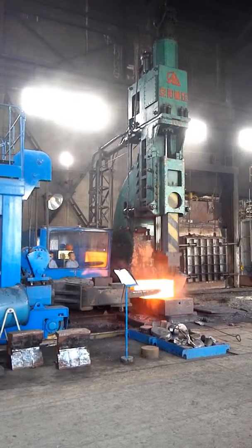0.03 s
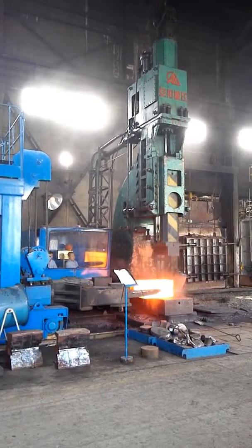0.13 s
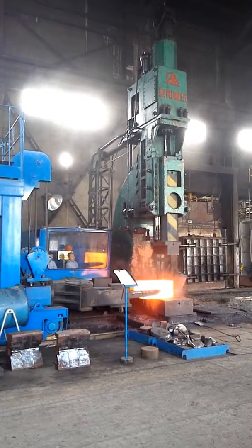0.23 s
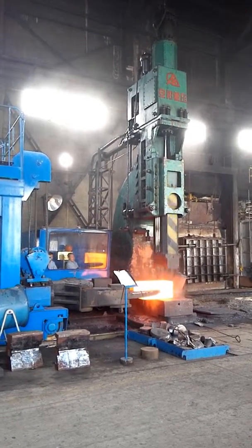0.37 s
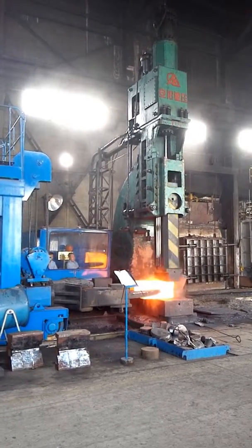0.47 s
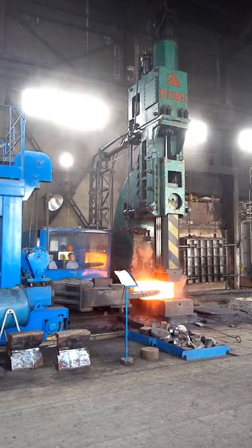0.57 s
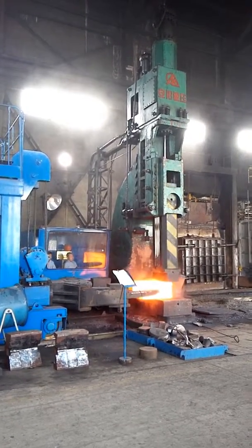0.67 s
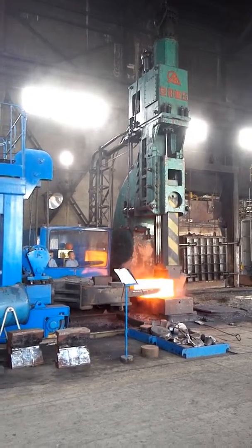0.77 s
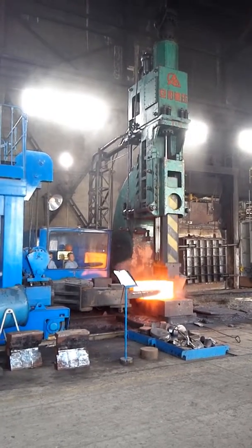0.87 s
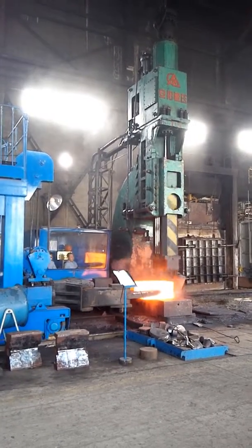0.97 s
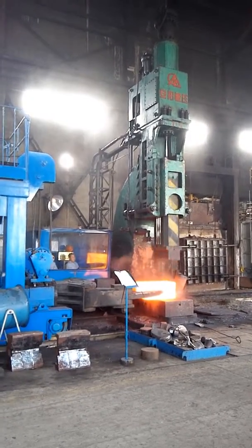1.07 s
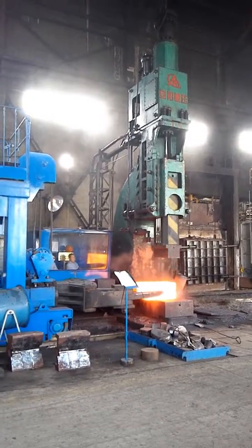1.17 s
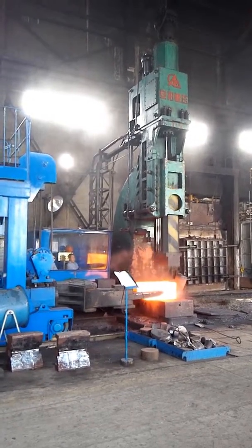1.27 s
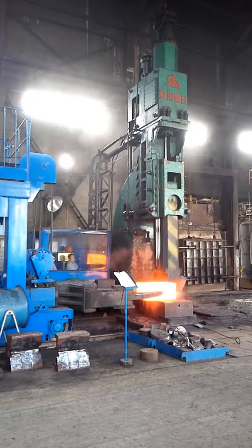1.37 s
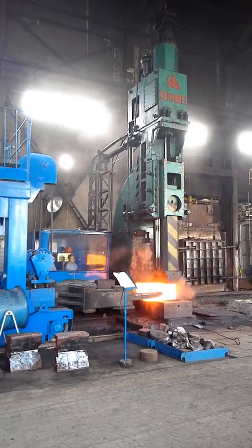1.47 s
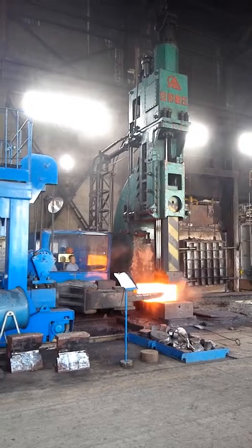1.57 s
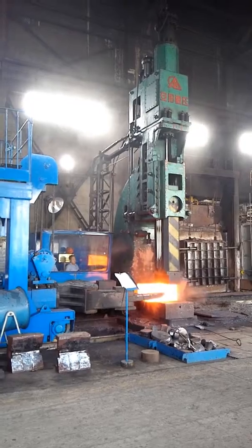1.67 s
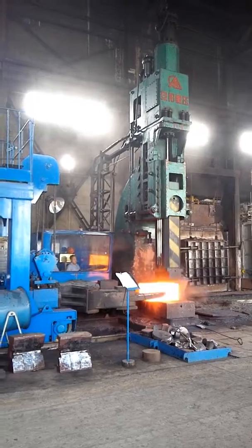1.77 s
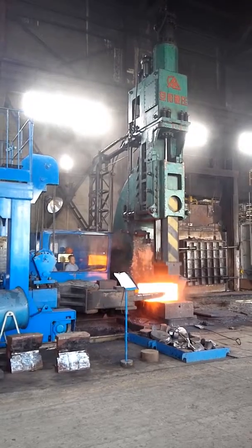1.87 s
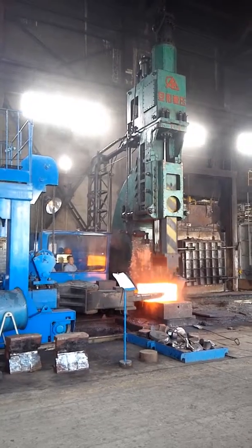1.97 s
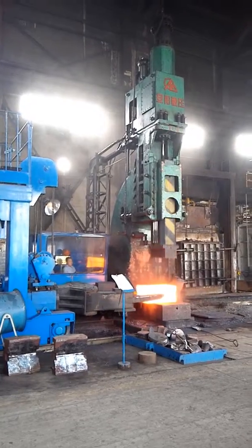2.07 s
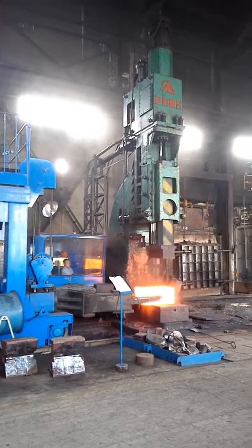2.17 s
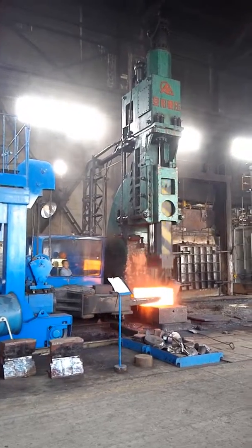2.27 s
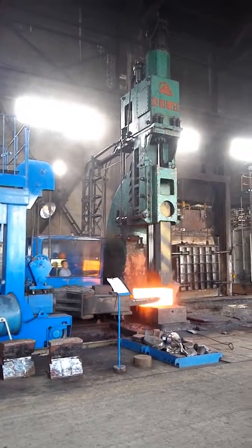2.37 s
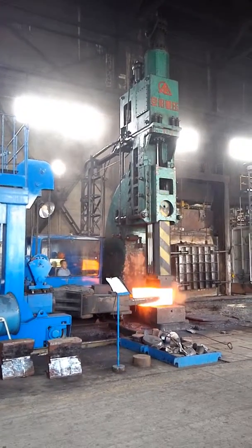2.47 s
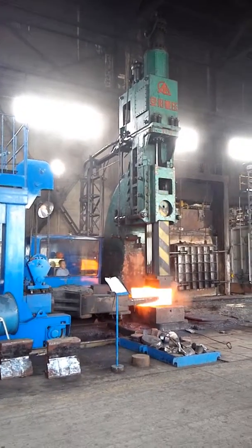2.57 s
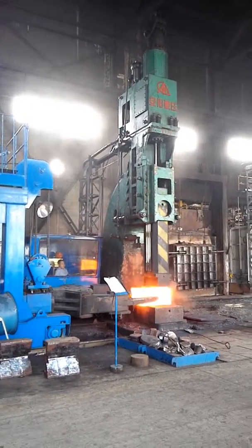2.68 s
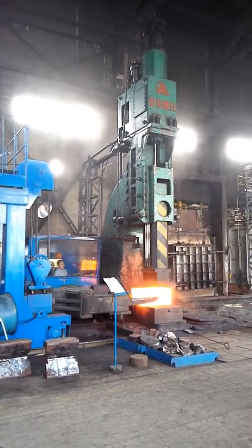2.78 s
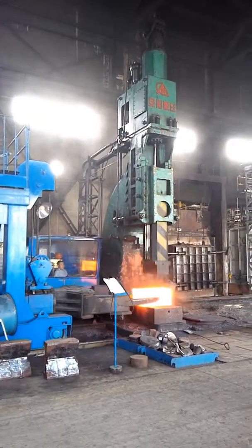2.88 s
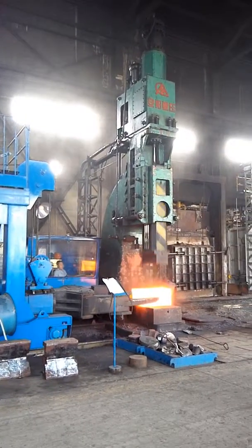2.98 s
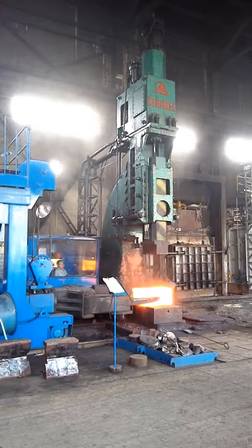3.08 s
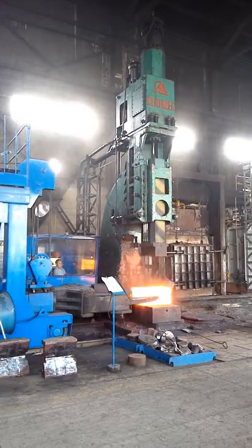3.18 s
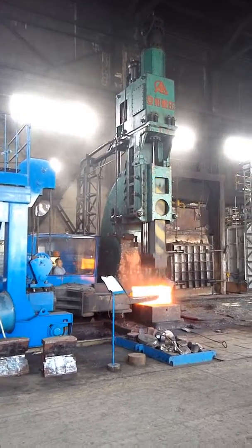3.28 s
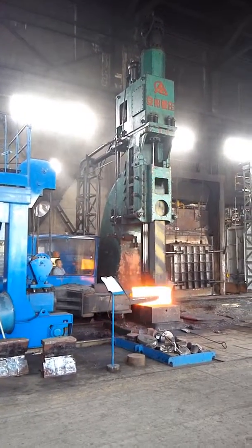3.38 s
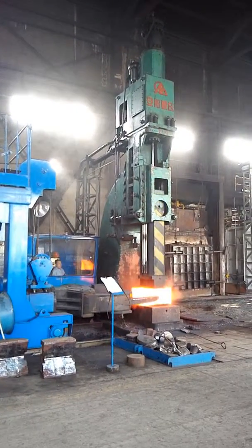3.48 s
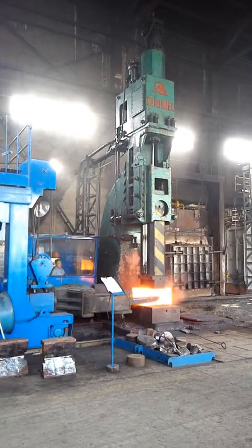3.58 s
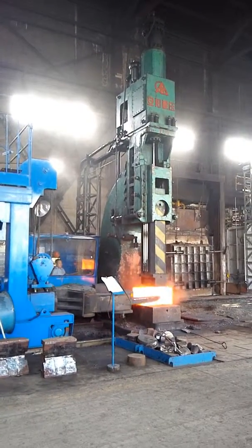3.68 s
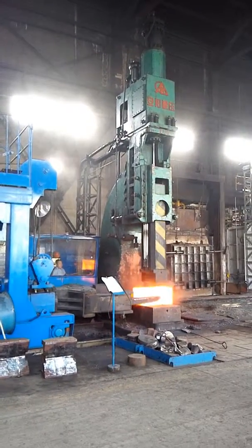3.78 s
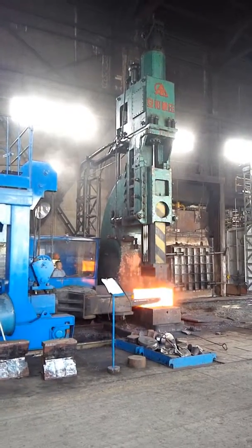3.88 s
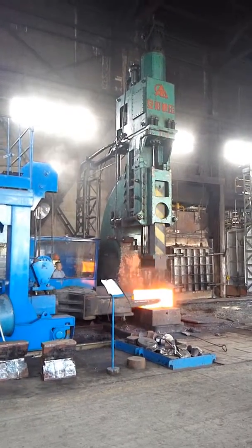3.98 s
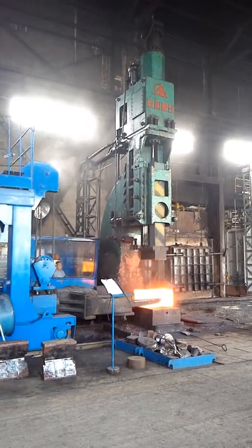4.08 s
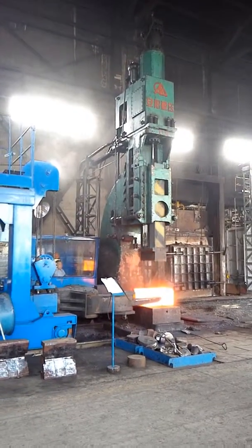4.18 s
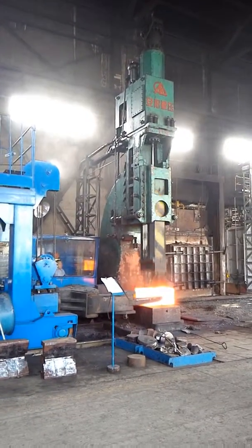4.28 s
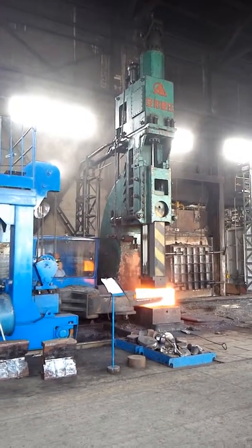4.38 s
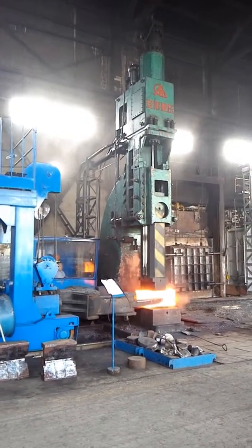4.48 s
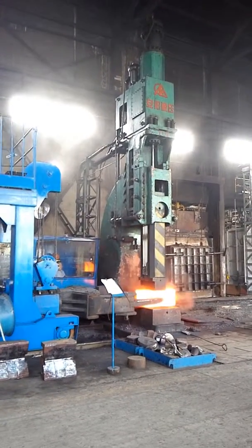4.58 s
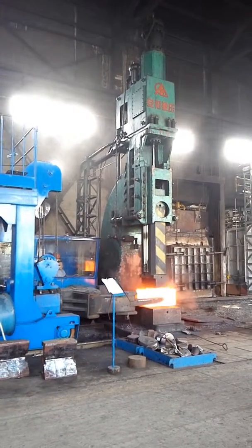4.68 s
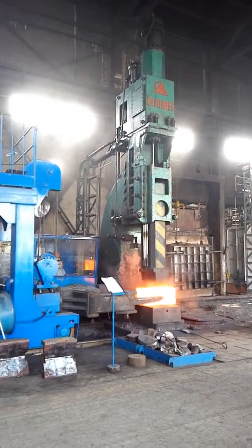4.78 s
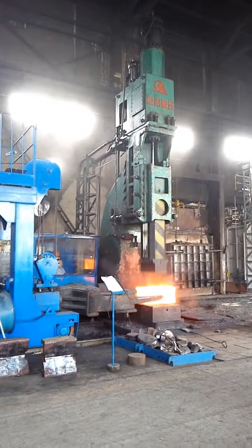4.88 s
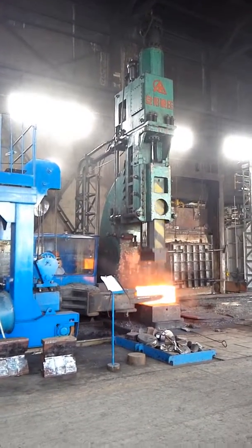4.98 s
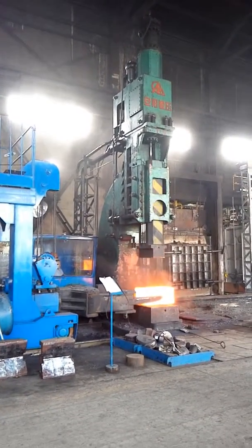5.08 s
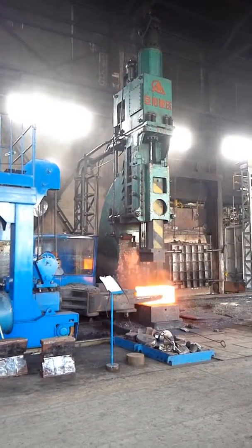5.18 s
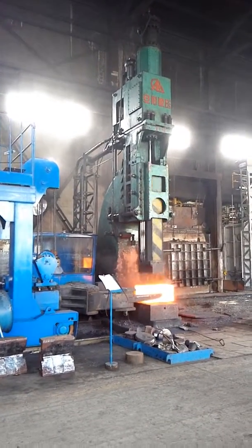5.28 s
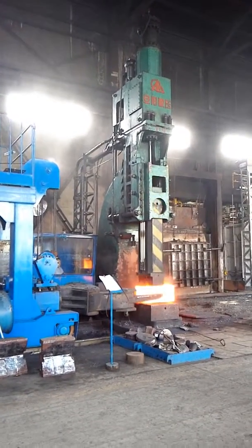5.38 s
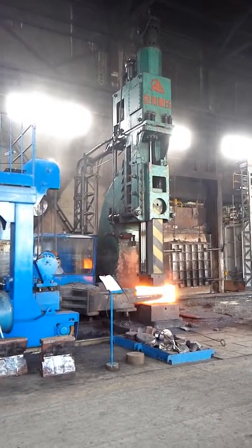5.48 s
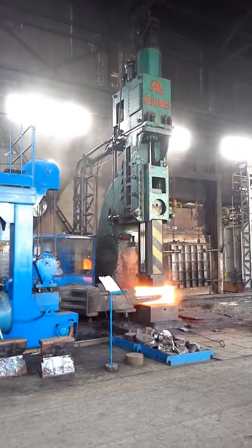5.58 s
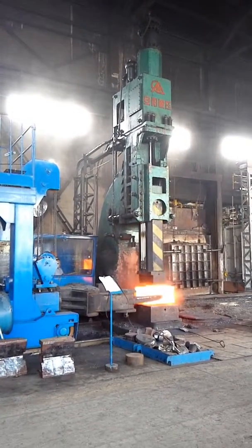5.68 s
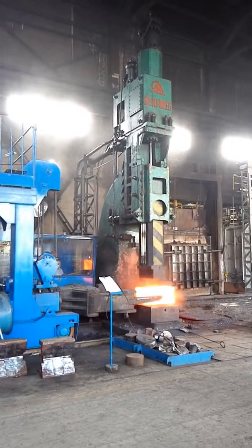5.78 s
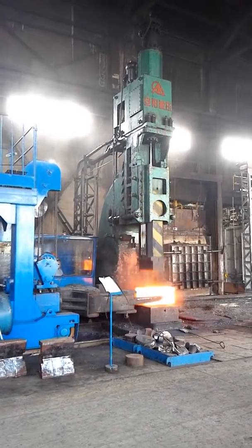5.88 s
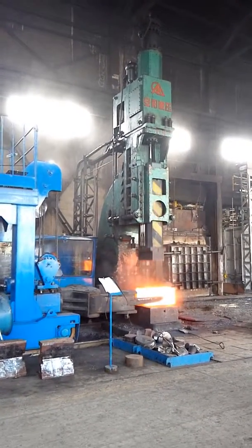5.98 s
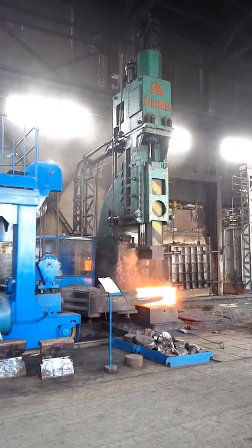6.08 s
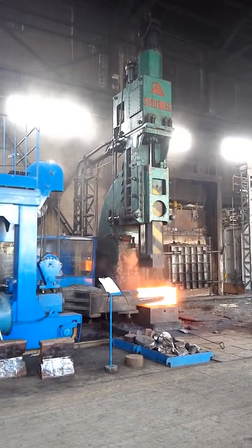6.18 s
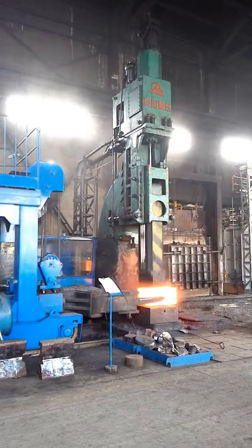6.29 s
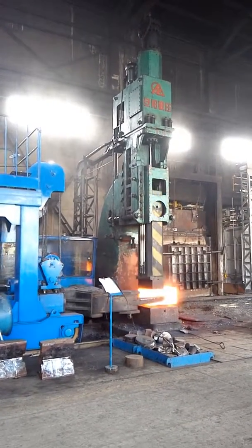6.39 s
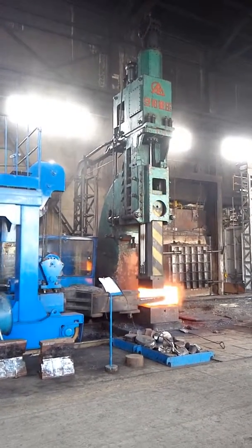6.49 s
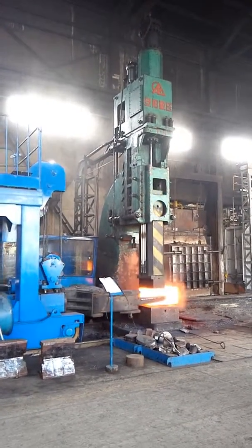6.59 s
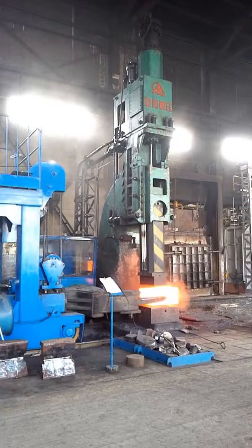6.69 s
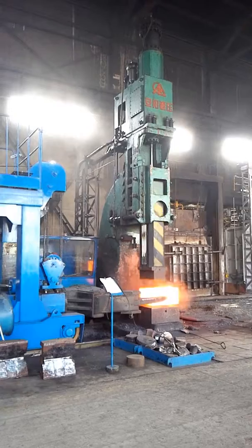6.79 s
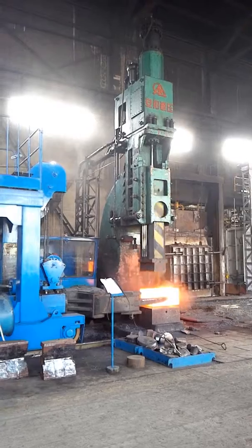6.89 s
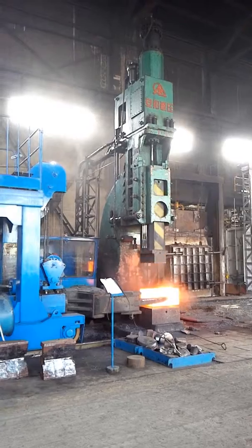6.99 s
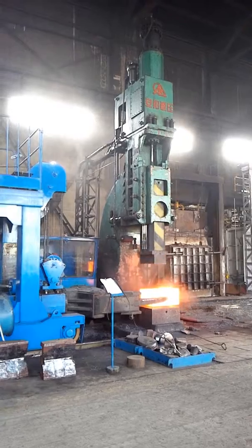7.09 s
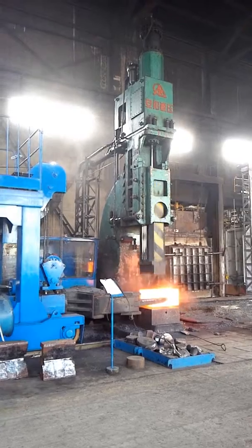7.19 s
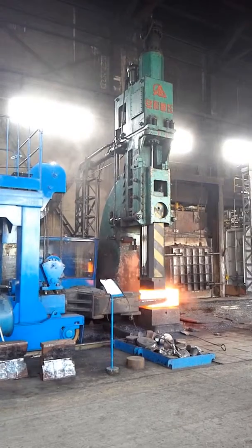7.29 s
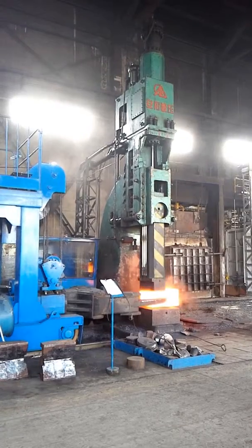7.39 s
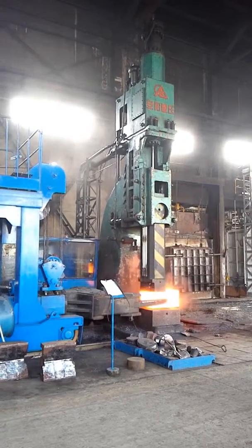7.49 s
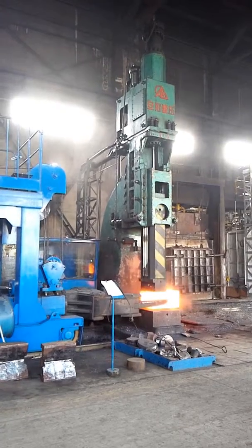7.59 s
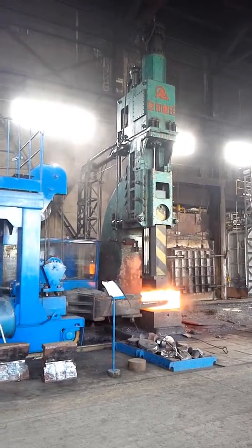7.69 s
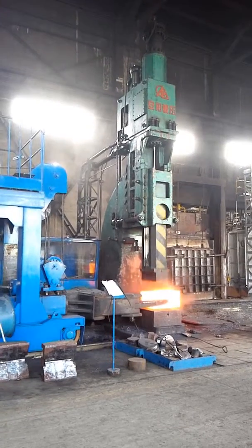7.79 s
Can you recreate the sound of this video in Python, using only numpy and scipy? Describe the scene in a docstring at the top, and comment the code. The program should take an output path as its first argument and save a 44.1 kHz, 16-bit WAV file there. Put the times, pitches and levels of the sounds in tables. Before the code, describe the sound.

The tail of a previous blow is fading over a low burner and fan drone. Then eight heavy hammer blows follow at nearly even one-second spacing, the early ones duller, the later ones harder and more ringing. Between them come short airy valve hisses, a few loose steel knocks and tiny high chinks. The large hall smears every strike into the next. Stereo handheld-style pickup from several metres, slightly clipped on peaks.

```python
"""A drone of furnaces and pumps fills a huge steel-framed hall in which an earlier hammer blow is still dying away.
A hydraulic forging hammer, some metres off, then strikes hot steel about once a second. Each blow is a push on
the ground, short-lived modes of ram and dies, longer ones of the frame, and a crash of noise; the valve hisses on
each return stroke, loose steel knocks and small parts chink. The hall is noise in third octaves, shaped by the
energy of blows and valve after two-slope echoes. Two small microphones hear it in stereo."""
import sys
import numpy as np
from scipy import signal
from scipy.fft import rfft, irfft
from scipy.io import wavfile

SR = 44100
rng = np.random.default_rng(int(sys.argv[2]) if len(sys.argv) > 2 else 0)


def invert_db(level):
    """Linear amplitude ratio for a level in decibels (20 dB per decade), elementwise."""
    return 10 ** (np.asarray(level, dtype=float) / 20)


def inscribe(sig):
    """Save sig as 16-bit PCM at rate SR to the path in sys.argv[1].

    A 1-D sig is mono; a 2-D sig holds one channel per row.
    Samples are clipped to [-1, 1] before scaling.
    """
    pcm = np.round(np.clip(np.atleast_2d(sig).T, -1, 1) * 32767)
    wavfile.write(sys.argv[1], SR, pcm.astype(np.int16))


N = 345744
STEP, LEAD = 21, 1050  # samples per step of an energy curve; steps kept before the start


def along(table, hz, column=1):
    """Read a table column between its rows on a log-frequency axis."""
    rows = np.array(table, float)
    return np.interp(np.log(hz + 1), np.log(rows[:, 0]), rows[:, column])


def colour(x, table):
    """Filter by a spectrum table, then scale to unit rms."""
    y = irfft(rfft(x) * invert_db(along(table, np.fft.rfftfreq(N, 1 / SR))), N)
    return y / np.sqrt(np.mean(y ** 2))


def fade(t, t60, rise):
    """Swell with time constant rise, then fall 60 dB in t60."""
    return (1 - np.exp(-t / max(rise, 1e-4))) * 1000. ** (-t / t60)


def walk(rate, size=2):
    """Slow random wander through rate normal knots a second, spread near 1."""
    knots = rng.standard_normal((size, int(N / SR * 40)))
    at = np.arange(N) / SR * rate
    return np.array([np.interp(at, np.arange(len(k)), k) for k in knots])


def add(out, x, i):
    """Mix x into out from index i, trimming what falls outside."""
    a, b = max(i, 0), min(i + x.shape[-1], out.shape[-1])
    if b > a:
        out[..., a:b] += x[..., a - i:b - i]


# How alike sound from all sides is at the two microphones: pitch_hz, left_right_correlation
LIKENESS = [(30, .93), (70, .965), (150, .94), (280, .62), (450, -.05), (650, -.33), (1000, .05),
            (1340, .12), (2900, 0)]


def diffuse(size):
    """Spectrum of stereo noise that arrives from all sides: nearly alike at both ports in the bass only."""
    like = np.clip(along(LIKENESS, np.fft.rfftfreq(size, 1 / SR)), -.99, .99)
    mid, side = rfft(rng.standard_normal((2, size)))
    mid = mid * np.sqrt(1 + like)
    side = np.array([[1], [-1]]) * side * np.sqrt(1 - like)
    return (mid + side) / np.sqrt(2)


# Spectrum of burners and fans, before scaling to unit rms: pitch_hz, level_db (per Hz, relative)
DRONE_SPECTRUM = [(25, -16), (60, 5.5), (130, -4), (300, 1.5), (500, -5.5), (1200, -9), (2500, -18),
                  (5000, -24), (9000, -23.5), (14000, -39.5)]
# Pump tones, mean level: pitch_hz, level_db
PUMP_TONES = [(150.7, -40), (290.7, -44), (366, -55), (1215, -52)]
DRONE_DB = -36  # mean level of the roar


def drone():
    """Far furnace burners and fans as diffuse noise, with a few pump tones wavering in level and phase."""
    t = np.arange(N) / SR
    roar_gain = invert_db(DRONE_DB + 0.4 * walk(3.3, size=1))
    out = roar_gain * colour(irfft(diffuse(N), N), DRONE_SPECTRUM)
    for hz, db in PUMP_TONES:
        gain = invert_db(db + 0.88 * walk(8, size=1))
        out = out + gain * np.sin(2 * np.pi * hz * t + 1.65 * walk(5, size=1))
    return out


# Hammer blows, the first before the start; contact is the rise time constant, hum is the frame near 470 Hz,
# levels set each blow's parts relative to other blows: start_s, crash_db, thud_db, contact_s, hum_db
BLOWS = [(-.42, -14.5, -16, 0.0029, -33), (0.5545, -14, -15, 0.0027, -40), (1.479, -19.5, -15, 0.0034, -37),
         (2.500, -18, -16, 0.0025, -29), (3.488, -12, -15.5, 0.0025, -22), (4.477, -12, -15, 0.0028, -22.5),
         (5.4457, -13, -15, 0.0015, -21.5), (6.412, -9.5, -13, 0.0038, -20),
         (7.384, -12, -15, .0022, -22.5)]
# Colour of crashing loose steel: pitch_hz, level_db (per Hz, relative)
CRASH_SPECTRUM = [(150, -7.5), (300, 4), (600, -1), (1100, 0), (2000, -6), (2800, -5.5), (3800, -5.5),
                  (6000, -8.5), (9000, -6.5), (14000, -19.5)]
# Colour of anvil and ground: pitch_hz, level_db (per Hz, relative)
THUD_SPECTRUM = [(25, -6), (60, -15), (120, 0.5), (250, -2.5), (400, -23.5), (700, -35)]
FULL_DB = -12  # crash of a full blow
DULL_DB_PER_OCTAVE = 0.1124  # tilt of the crash for each dB away from a full blow
HALL_DB = -6  # crash fed to the hall, relative to crash_db


def blows():
    """Energy of each blow for the hall: thud, crash, loose steel rattling on; weaker blows are duller."""
    t, out = np.arange(500) * STEP / SR, []
    for s, crash_db, thud_db, rise, _ in BLOWS:
        rattle = invert_db(-23 + 5.33 * rng.standard_normal(len(t))) * fade(t, 0.36, 0.013)
        crash = fade(t, .04, rise) + rattle
        tilt_db = DULL_DB_PER_OCTAVE * (crash_db - FULL_DB)
        out.append((s, crash, CRASH_SPECTRUM, crash_db + HALL_DB, tilt_db))
        out.append((s, fade(t, 0.19, 0.021), THUD_SPECTRUM, thud_db, 0))
    return out


# Echo of the hall; far walls and near machines fall at their own pace, flutter runs floor to roof:
# pitch_hz, far_t60_s, near_t60_s, near_over_far_db, build_up_s, flutter_share
HALL_ECHO = [(60, 4.05, 0.46, -1, 0.003, 0.51), (250, 4.22, 0.22, -19, 0.0039, 0.36),
             (504, 5, 0.61, -3, 0.0051, 0.36), (980, 3.74, 0.13, 8, 0.0046, .1),
             (2020, 2.92, 0.49, -1, 0.00078, .1), (4060, 2.01, 0.29, 0, 0.00089, .05),
             (8560, 1.534, 0.39, 4.5, 0.0011, 0.041), (13800, 0.49, 0.19, 7.5, 0.00083, .05)]
FLUTTER_S = 0.054  # floor-to-roof repeat time


def hall(bursts):
    """Energy of bursts (s, shape, colour, dB, tilt) builds up and dies in two slopes in each third octave."""
    t = np.arange(3 * SR // STEP) * STEP / SR
    hz, out = np.fft.rfftfreq(N, 1 / SR), 0
    # countless small steel parts ring along: a fine, fixed unevenness of the spectrum
    parts = np.interp(hz / 30, np.arange(1000), rng.standard_normal(1000))
    noise = diffuse(N) * invert_db(1.7 * parts * np.clip(hz / 3000, 0, 1))
    for centre in 25 * 2 ** np.arange(0, 9.5, 1 / 3):
        far, near, near_db, build, flutter = (along(HALL_ECHO, centre, column=c) for c in (1, 2, 3, 4, 5))
        echo = (fade(t, far, build) + invert_db(near_db) * fade(t, near, build)) ** 2
        echo *= 1 + np.clip(flutter, 0, 1) * np.cos(2 * np.pi * t / FLUTTER_S) * np.exp(-t / 0.25)
        power = np.zeros(N // STEP + LEAD + 1)
        for s, shape, table, db, tilt_db in bursts:
            # the tilt pivots at 2 kHz
            gain = invert_db(db + along(table, centre) + tilt_db * np.log2(centre / 2000))
            add(power, (gain * shape) ** 2, round(s * SR / STEP) + LEAD)
        power = np.maximum(signal.fftconvolve(power, echo)[LEAD:len(power)], 0)
        # echoes arrive in clumps, so the decay stumbles
        knots = rng.standard_normal(500)
        clumps = invert_db(1.64 * np.interp(np.arange(len(power)) / 70, np.arange(500), knots))
        band = np.cos(np.pi / 2 * np.clip(3 * np.log2((hz + 1) / centre), -1, 1))
        level = np.repeat(np.sqrt(power) * clumps, STEP)[:N]
        out = out + irfft(noise * band, N) * level
    return out


SCATTER_DB, DETUNE = 1.8, .005  # every hit lands elsewhere: spread of mode level, and of pitch as a share


def modes(rows, t, range_db, split, rate):
    """Fading sines (Hz, left dB, right dB, t60, swell) that waver as reflections arrive in ever new phase.

    range_db holds one level for each range of pitch between the split frequencies."""
    out = 0
    for hz, left_db, right_db, t60, swell in rows:
        knots = rng.standard_normal((2, int(t[-1] * rate) + 2))
        bass_steady = min(hz / 700, 1)  # low modes waver less
        drift, waver = (bass_steady * np.interp(t * rate, np.arange(len(k)), k) for k in knots)
        start, lag = rng.uniform(0, 2 * np.pi, 2)
        louder, higher = rng.standard_normal(2)
        level_db = range_db[np.searchsorted(split, hz)] + SCATTER_DB * louder + 3.04 * waver
        shape = invert_db(level_db) * fade(t, t60, swell) * (1 - np.exp(-t / swell))
        phase = 2 * np.pi * hz * (1 + DETUNE * higher) * t + start + 0.92 * drift
        # the phase gap between left and right shrinks in the bass
        gap = np.array([[0], [lag * bass_steady ** 3]])
        ports = invert_db([[left_db], [right_db]]) * np.exp(1j * gap)
        out = out + (ports * shape * np.exp(1j * phase)).imag
    return out


# Ram and dies, damped by the hot billet, relative levels and nominal pitch: pitch_hz, left_db, right_db, t60_s
CLANG_MODES = [(715, -12, -2, 0.1), (837, -2, 6.5, 0.11), (937, -5.5, 2.5, 0.14), (1116, -4, 0.5, 0.23),
               (1253, -23, 4, 0.1), (1560, -4, 0, 0.14), (1886, -4, 0, 0.11), (3080, -2.5, -2, 0.13),
               (3380, -1, -7, 0.26), (3470, -2, -5, .2), (3680, -12, -2, 0.12), (4140, 0, 2, 0.16),
               (4980, 3.5, 3, 0.12), (6300, -2, 4, 0.066), (8260, 7, 5, 0.054), (8400, -6, -14, 0.14)]
# Frame, plates and hall columns, relative levels and nominal pitch; swell is a time constant:
# pitch_hz, left_db, right_db, t60_s, swell_s
RING_MODES = [(95.5, -3.5, -4, 1.5, 0.046), (120.3, -3.5, -5, 1.1, 0.034), (143.7, -3, -5, 1.6, 0.068),
              (239.3, -5, -5, 1.53, 0.067), (292, -7, -5, 1.26, 0.074), (468, 16, 9, 0.49, 0.088),
              (936, -11, -5.5, 1.05, 0.028), (1145, -17.5, -10, 3.3, 0.036), (1197, -12, -8, 4, 0.027),
              (1490, -7.5, -8, 2, 0.027), (1963, -17, -5, 2.36, 0.055), (2028, -5.5, -11, 2.9, 0.061),
              (3430, -12, -8, 1.2, 0.022), (3420, -5, -14, 1.2, 0.022), (4300, -19, -17, 0.66, 0.025),
              (4512, -19, -21, 0.61, .02), (5300, -18, -18, 0.57, .02)]
CLANG_DB, CLANK_DB = -5.5, -10  # dies under and over 2.5 kHz at usual contact, relative to the crash
USUAL_RISE_S = .0028  # usual contact rise
SHARP_DB = 2.5  # halving the contact rise takes this from the low clang and gives it to the high
PUSH_DB, BOOM_DB = 6.5, -7.5  # push on the anvil and ring under 300 Hz, relative to the thud
MIDDLE_DB = -27  # ring from 600 Hz to 1.7 kHz
UPPER_DB, UPPER_SHARE = -26, 0.77  # ring above 1.7 kHz at a full blow; share of the crash's dB it follows
CLATTER_DB = 20  # gain of the single ticks, relative to the crash


def hammer():
    """Direct sound: push on the anvil, clang of the dies, ring of the frame, clattering scale and tools."""
    out = np.zeros((2, N))
    t, long = np.arange(SR // 4) / SR, np.arange(6 * SR // 5) / SR
    # the billet squashes, so the push lasts a few ms
    squash = (t - .005) / 0.0014
    push = -squash * np.exp(-squash ** 2)
    tick = signal.butter(2, [1200, 9000], "bandpass", fs=SR, output="sos")
    for s, crash_db, thud_db, rise, hum_db in BLOWS:
        i = round(s * SR)
        sharp_db = SHARP_DB * np.log2(USUAL_RISE_S / rise)
        clang_db = [crash_db + CLANG_DB - sharp_db, crash_db + CLANK_DB + sharp_db]
        clang = modes([r + (rise,) for r in CLANG_MODES], t, clang_db, split=[2500], rate=140)
        add(out, clang + invert_db(thud_db + PUSH_DB) * push, i)
        upper_db = UPPER_DB + UPPER_SHARE * (crash_db - FULL_DB)
        ring_db = [thud_db + BOOM_DB, hum_db, MIDDLE_DB, upper_db]
        ring = modes(RING_MODES, long, ring_db, split=[300, 600, 1700], rate=35)
        # sparse random ticks, 400 a second on each side
        chance = rng.random((2, 2, len(long)))
        clatter = (chance[0] < 400 / SR) * (chance[1] - .5) * fade(long, .9, 0.0032)
        clatter = invert_db(crash_db + CLATTER_DB) * signal.sosfilt(tick, clatter)
        close = np.cos(long / long[-1] * np.pi / 2)  # eases both to silence
        add(out, (ring + clatter) * close, i)
    return out


# Valve on each return stroke; rise is a time constant: start_s, hiss_db, rise_s, open_s
HISSES = [(.265, -45.5, 0.023, 0.12), (1.205, -46.5, .02, 0.22), (2.19, -49.5, .0016, 0.11),
          (3.161, -40.5, .001, 0.27), (4.15, -40, 0.028, 0.084), (5.10, -47, .03, .16),
          (6.05, -49.5, .03, .15), (7.10, -45, 0.033, 0.12)]
# Loose steel knocking between blows, level in the hall: start_s, level_db, t60_s
KNOCKS = [(3.183, -45, 0.27), (5.941, -40.5, 0.028)]
# Colour of the valve in the hall: pitch_hz, level_db (per Hz, relative)
JET_SPECTRUM = [(300, -19), (1500, -2), (7500, -6.5), (8500, -5.5), (10500, -17), (14000, -31)]
# Thin direct hiss, before scaling to unit rms: pitch_hz, level_db (per Hz, relative)
NOZZLE_SPECTRUM = [(5000, -24), (7800, -10), (8400, 3), (9200, -2), (10200, -4), (11200, -11), (14000, -14)]
ROAR_DB, ROAR_TILT_DB = -22, 3  # valve in the hall: relative to the hiss; per octave
SAG_T60_S, SHUT_T60_S = 1.4, 0.26  # fall from the opening on, and the further fall added once it shuts
KNOCK_RISE, KNOCK_TILT_DB = 0.03, -.8  # rise as a share of t60; per octave
KNOCK_HISS_DB = 4  # thin top of a knock heard straight, relative to its hall level
WHISTLE_HZ, WHISTLE_DB, WHISTLE_T60_S = 8420, 4.5, .5  # nominal pitch; relative to the hiss; decay


def valve():
    """Oil and air hiss as the ram lifts, loose steel knocks: energy for the hall, and a sputtering direct jet."""
    t, near = np.arange(SR) / SR, np.zeros(N)
    roar = []
    for s, db, rise, held in HISSES:
        shut = 1000. ** (-np.maximum(t - held, 0) / SHUT_T60_S)
        shape = fade(t, SAG_T60_S, rise) * shut
        roar.append((s, shape[::STEP], JET_SPECTRUM, db + ROAR_DB, ROAR_TILT_DB))
        add(near, invert_db(db) * shape, round(s * SR))
    for s, db, t60 in KNOCKS:
        shape = fade(t, t60, KNOCK_RISE * t60)
        roar.append((s, shape[::STEP], CRASH_SPECTRUM, db, KNOCK_TILT_DB))
        add(near, invert_db(db + KNOCK_HISS_DB) * shape, round(s * SR))
    sputter = invert_db(2 * walk(30, size=1))
    jet = near * sputter * colour(rng.standard_normal((2, N)), NOZZLE_SPECTRUM)
    # the valve whistles as it opens
    for s, db, rise, _ in HISSES:
        row = (WHISTLE_HZ, 0, 0, WHISTLE_T60_S, rise)
        whistle = modes([row], t[:SR // 2], [db + WHISTLE_DB], split=[], rate=150)
        add(jet, whistle, round(s * SR))
    return roar, jet


# Small parts that chink, nominal pitch and level: start_s, pitch_hz, level_db, t60_s
CHINKS = [(3.23, 9200, -53, .5), (3.29, 6760, -38, .2), (4.20, 7100, -52, .8), (5.15, 9260, -50, 0.49),
          (5.25, 7050, -53, 0.55), (5.941, 6000, -36, 0.099)]


def chinks():
    """Small steel parts shaken loose, each a single fading mode."""
    t, out = np.arange(SR // 2) / SR, np.zeros((2, N))
    for s, hz, db, t60 in CHINKS:
        chink = modes([(hz, 0, 0, t60, .004)], t, [db], split=[], rate=40)
        add(out, chink, round(s * SR))
    return out


def scene():
    """Hammer, valve, chinks and drone, with the hall fed by blows and valve."""
    roar, jet = valve()
    return hall(blows() + roar) + hammer() + jet + chinks() + drone()


def band_limit(x):
    """A steep low-pass at the top of the band."""
    return signal.sosfilt(signal.butter(12, 14370, fs=SR, output="sos"), x)


# Response of the small microphones: pitch_hz, gain_db
MIC_RESPONSE = [(20, -3), (80, -1.5), (7000, 3.5), (8300, 5), (9600, 9.5), (10600, 8), (12000, 2.5),
                (14200, 5.5)]
TOP_HZ = 14120  # steep upper limit


def record(dry):
    """The small microphones peak near 10 kHz and end steeply at the top; peaks beyond full scale clip."""
    hz = np.fft.rfftfreq(N, 1 / SR)
    response = invert_db(along(MIC_RESPONSE, hz)) / np.sqrt(1 + (hz / TOP_HZ) ** 200)
    heard = irfft(rfft(dry) * response, N)
    return band_limit(np.clip(heard, -1, 1))


dry = scene()
out = record(dry)
inscribe(out)
```